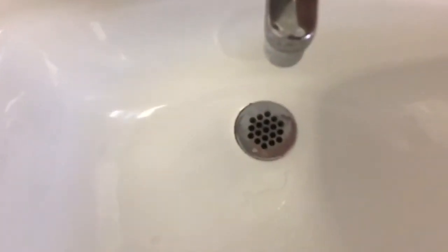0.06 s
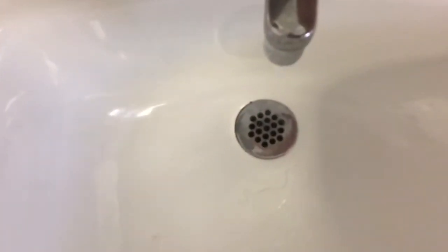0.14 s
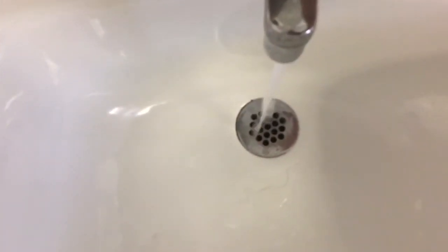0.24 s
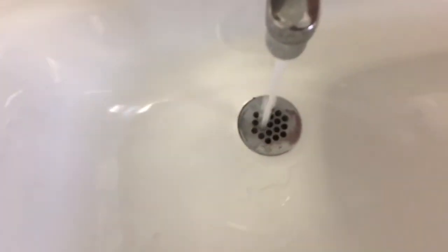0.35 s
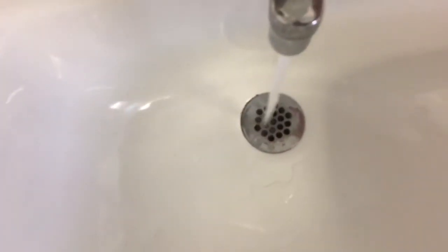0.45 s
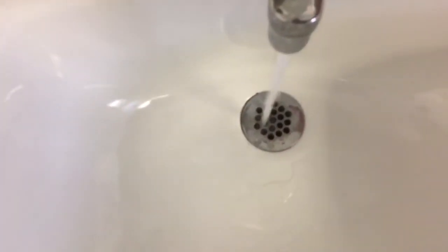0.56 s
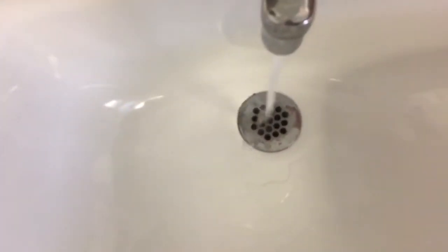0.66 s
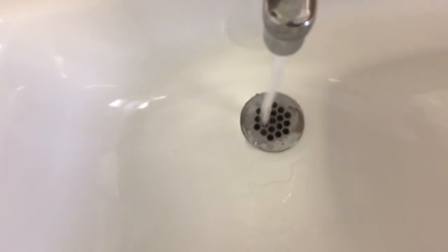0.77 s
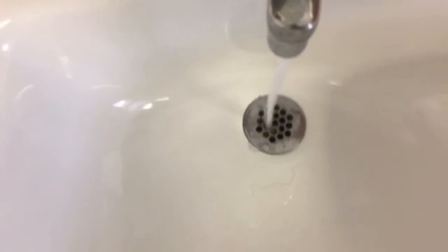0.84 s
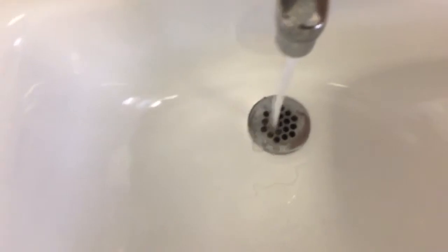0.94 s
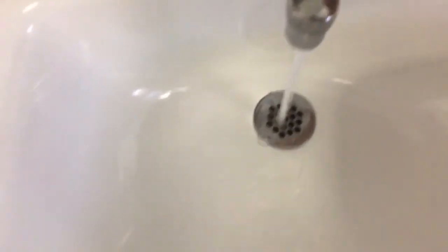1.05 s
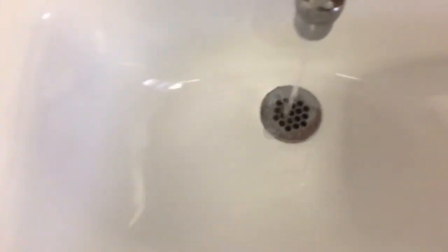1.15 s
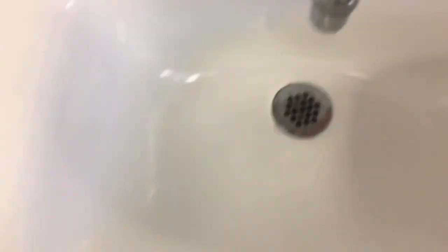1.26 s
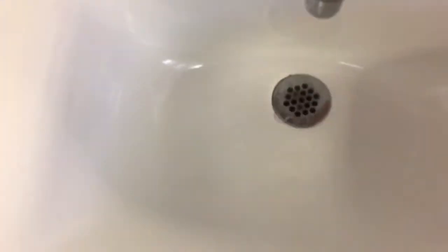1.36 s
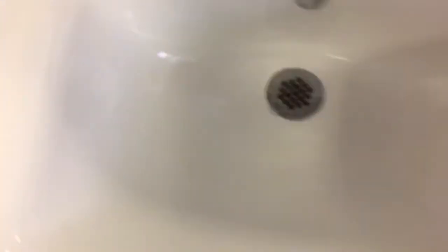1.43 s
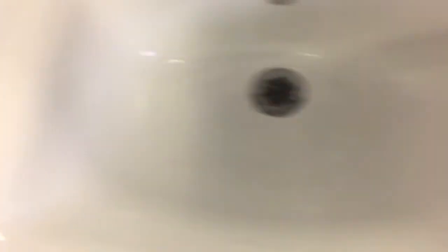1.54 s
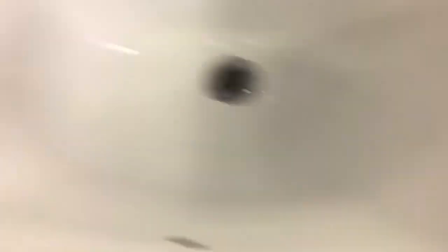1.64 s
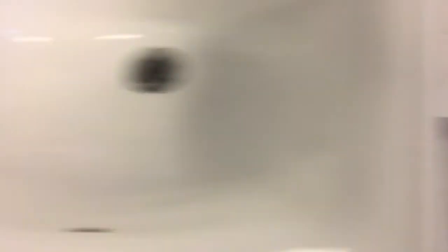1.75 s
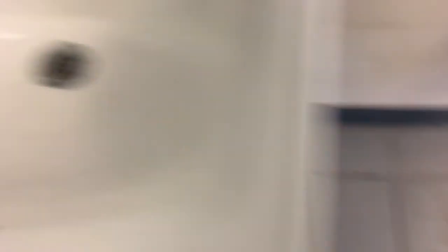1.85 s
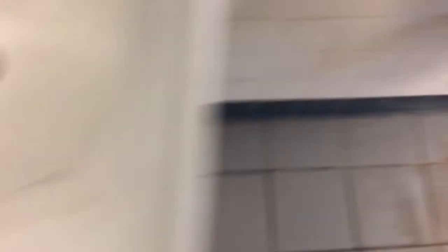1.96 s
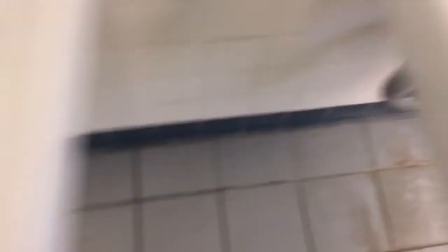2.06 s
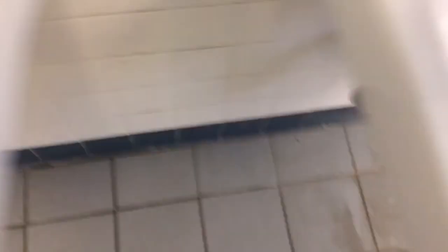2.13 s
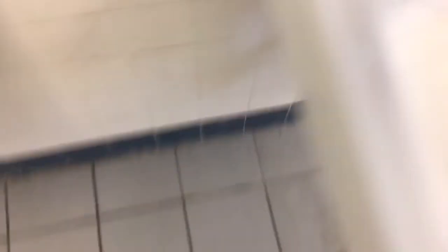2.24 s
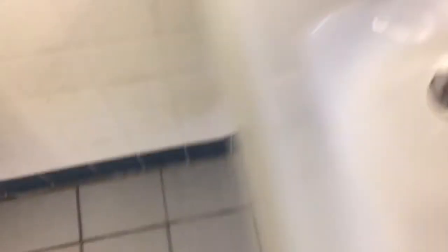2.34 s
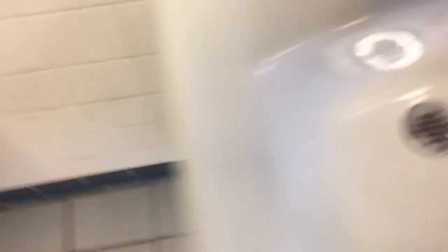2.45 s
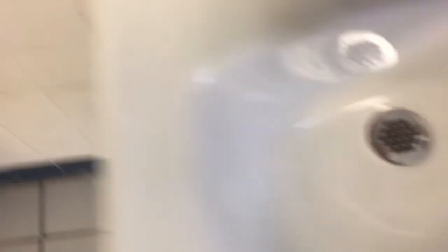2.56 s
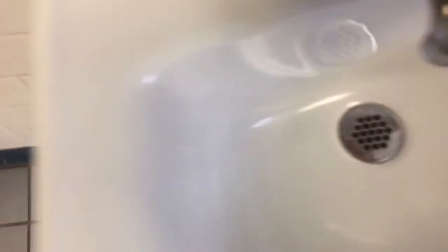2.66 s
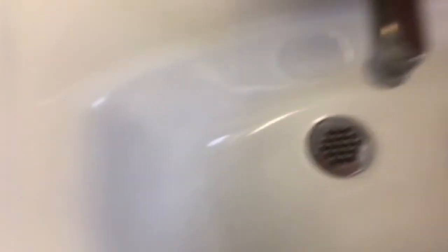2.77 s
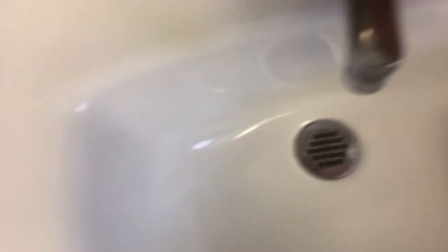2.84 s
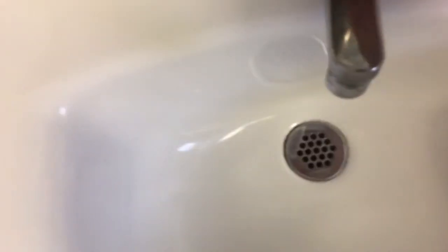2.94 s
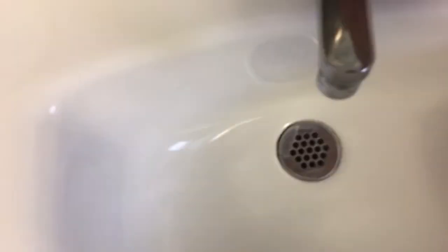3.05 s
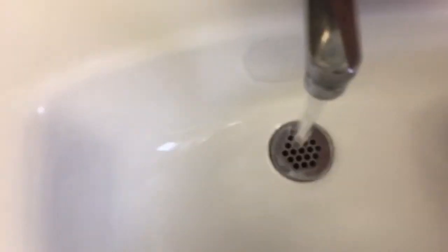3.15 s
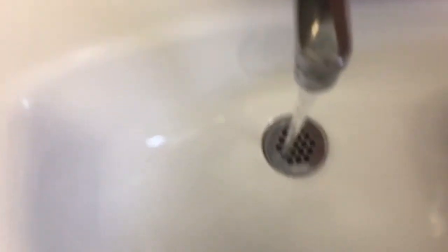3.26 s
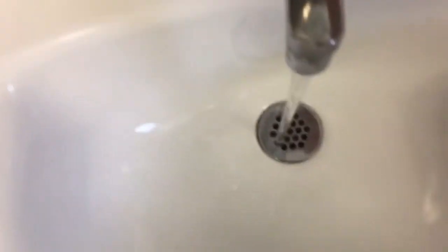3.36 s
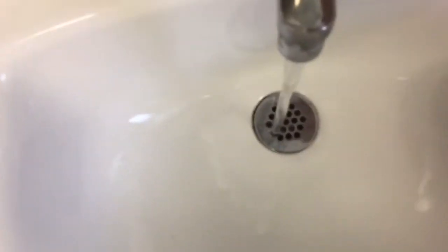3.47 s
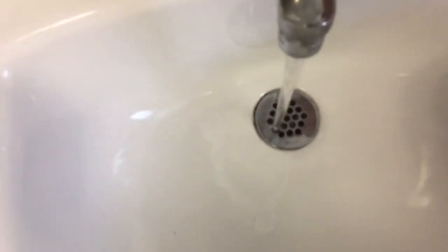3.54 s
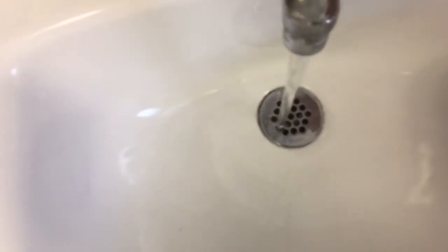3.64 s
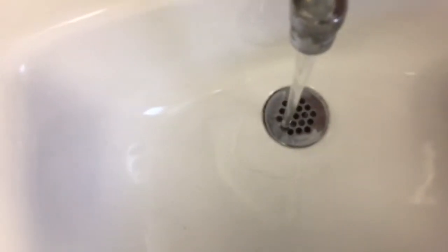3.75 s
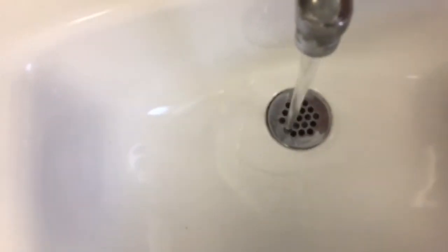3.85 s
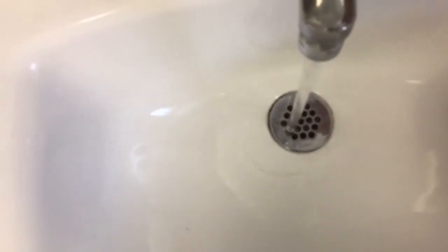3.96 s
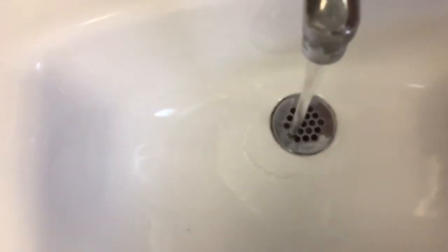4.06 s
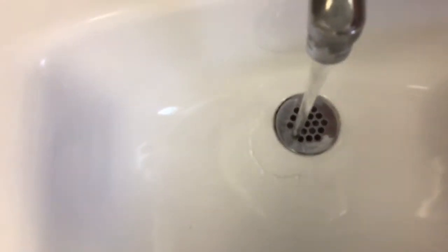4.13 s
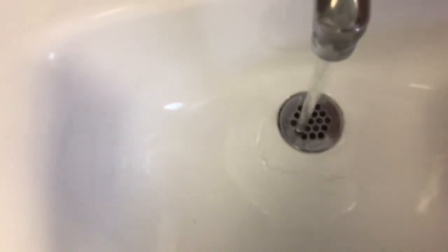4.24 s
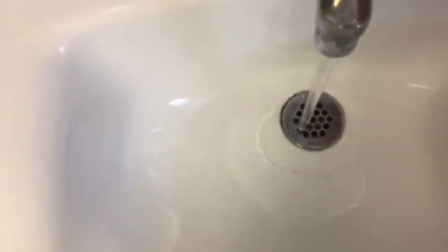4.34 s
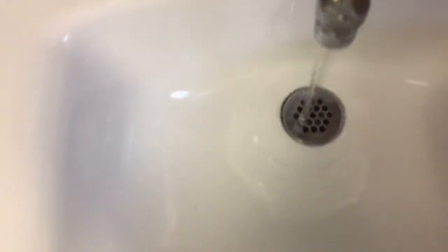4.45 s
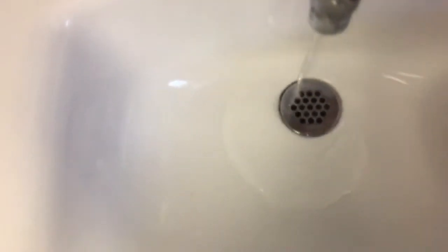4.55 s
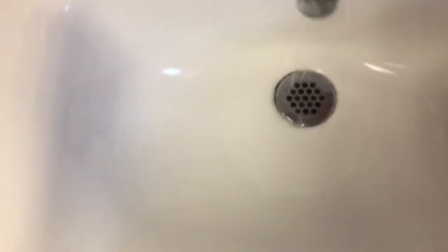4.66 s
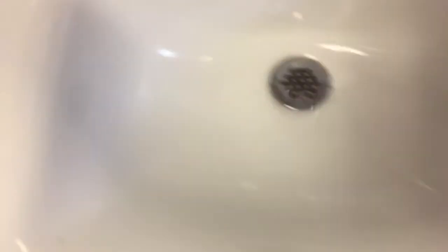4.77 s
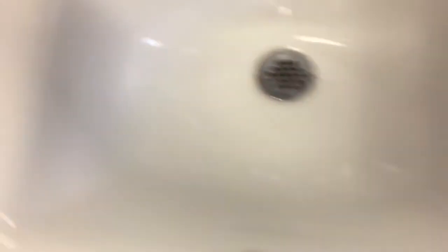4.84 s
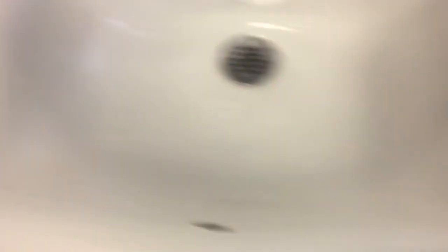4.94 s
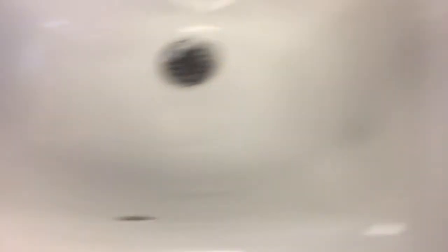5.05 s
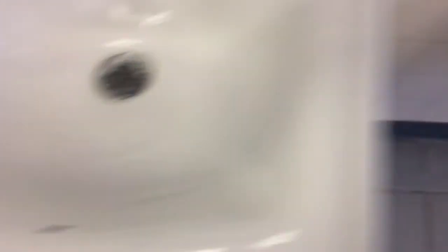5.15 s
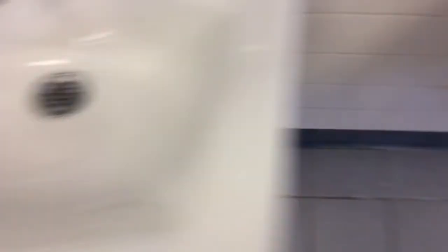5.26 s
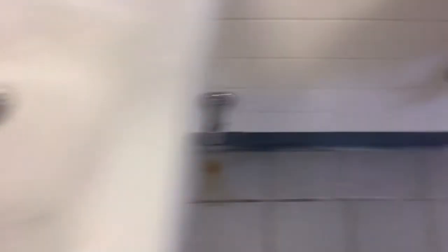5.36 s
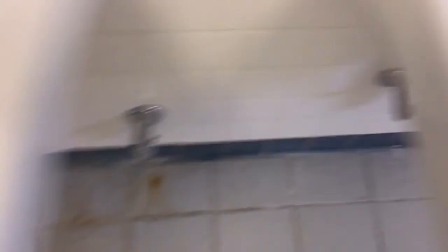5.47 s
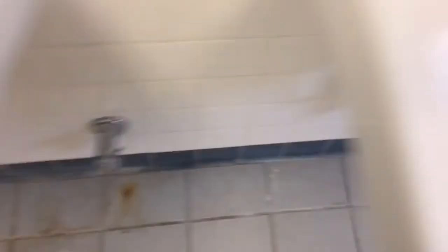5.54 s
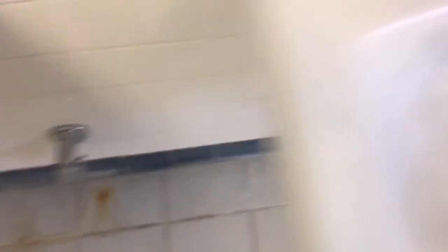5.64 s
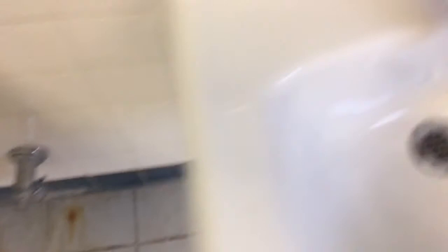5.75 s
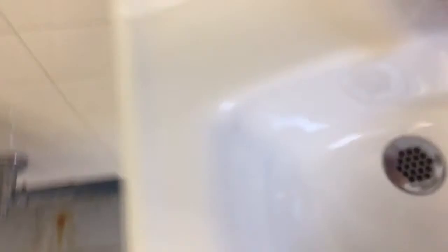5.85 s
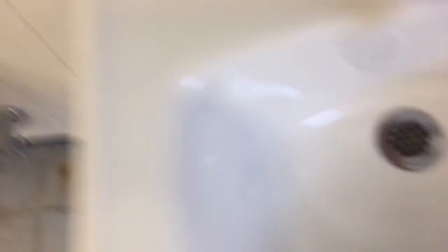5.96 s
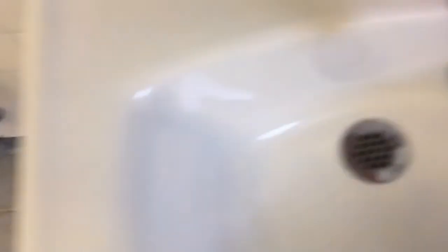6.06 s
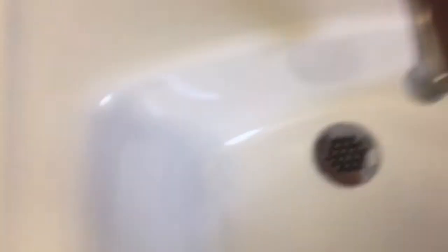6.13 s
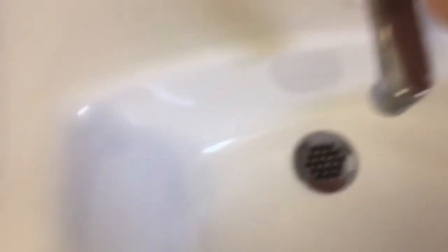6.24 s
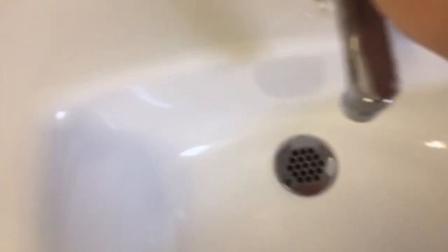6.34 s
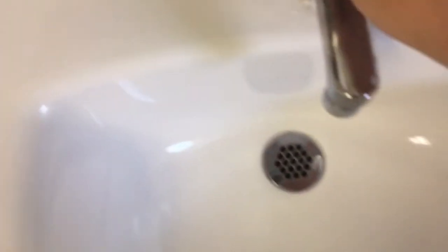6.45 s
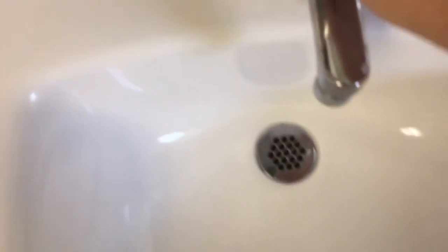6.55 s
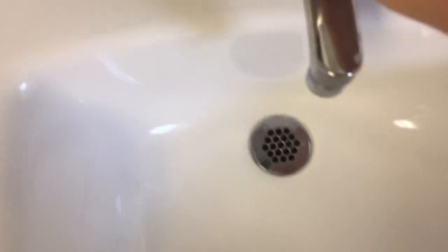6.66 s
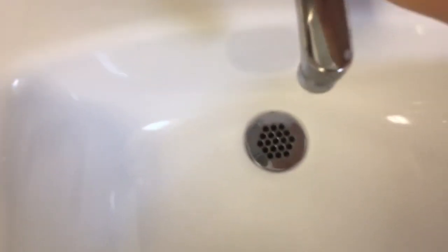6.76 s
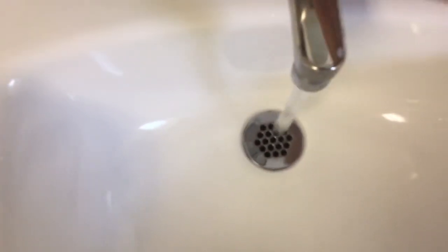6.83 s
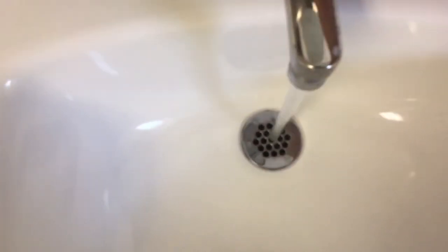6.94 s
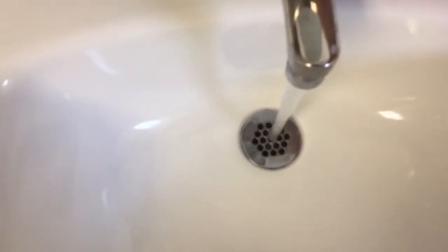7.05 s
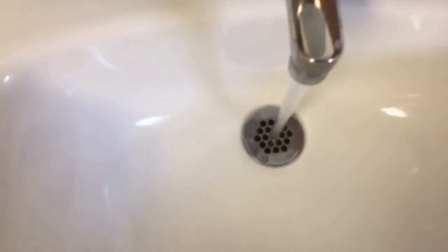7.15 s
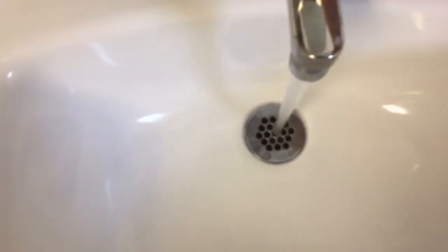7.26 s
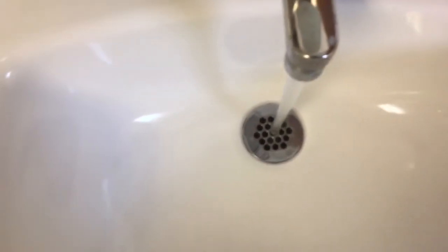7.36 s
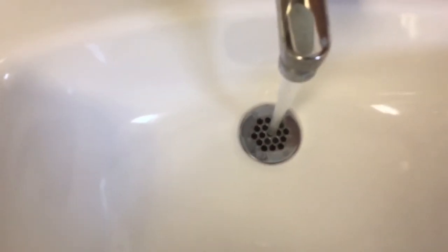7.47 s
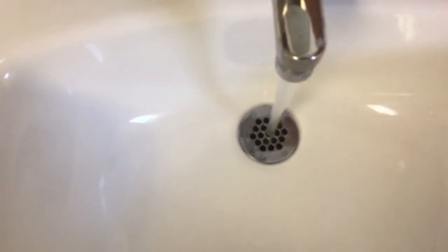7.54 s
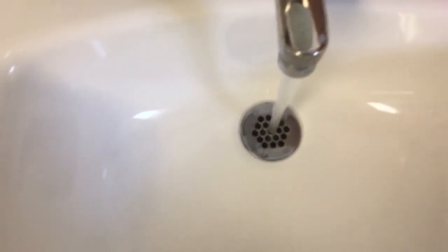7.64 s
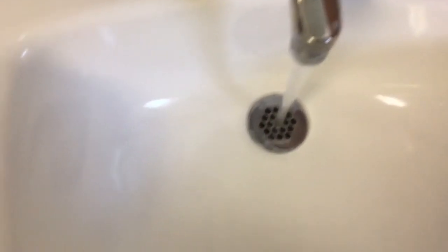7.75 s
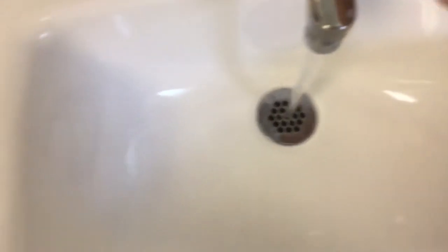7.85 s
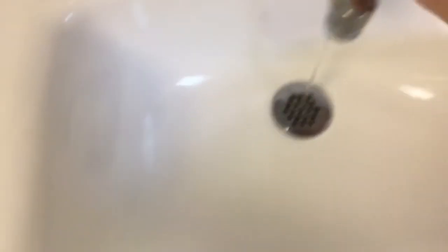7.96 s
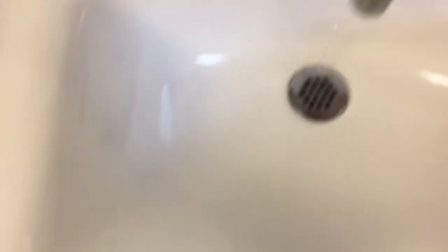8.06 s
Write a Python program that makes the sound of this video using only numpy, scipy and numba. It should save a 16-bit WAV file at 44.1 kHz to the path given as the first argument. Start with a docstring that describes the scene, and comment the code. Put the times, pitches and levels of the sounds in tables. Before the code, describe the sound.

A nearby tap splashes into a porcelain basin for about a second and dribbles to a stop. Shoes step quietly on tile, and a second, gentler tap runs with bubbly plops. After a few more soft scuffs, a third tap hisses sharply and its drain glugs. The small tiled washroom adds a short echo and a faint low hum.

```python
"""Three taps in a tiled washroom

Along a row of porcelain basins, three taps are opened and shut in turn, close to a phone microphone.
Each valve hisses through its pipe resonances, the jet fizzes on the drain grate, the waste pipe gurgles
and last drops spit. Between basins, shoes scuff and step on the tiles over the hum of the building."""
import sys
import numpy as np
from scipy import signal
from scipy.fft import rfft, irfft
from scipy.io import wavfile
from scipy.ndimage import uniform_filter1d
from numba import njit

SR = 44100
rng = np.random.default_rng(int(sys.argv[2]) if len(sys.argv) > 2 else 0)


def pcm_store(signal):
    """Save signal as 16-bit PCM."""
    levels = np.round(np.clip(np.atleast_2d(signal), -1, 1) * 32767)
    wavfile.write(sys.argv[1], SR, levels.astype(np.int16).T)


N = 357208
HZ = np.fft.rfftfreq(N, 1 / SR)
T = np.arange(N) / SR


def undb(db):
    """dB to gain."""
    return 10 ** (np.asarray(db) / 20)


def level(x, db=0):
    """Scale to an rms level."""
    return x * undb(db) / np.sqrt(np.mean(x ** 2))


def tone_db(spectrum, hz):
    """Read a spectrum table at given frequencies."""
    freq_hz, db = np.transpose(spectrum)
    return np.interp(np.log(hz + 1), np.log(freq_hz), db)


def noise(gain):
    """Noise of rms 1, shaped by a gain for each frequency."""
    return level(irfft(rfft(rng.standard_normal(N)) * gain, N))


def curve(tables, column):
    """Follow one column of several tables through time."""
    rows = np.vstack(tables)
    return np.interp(T, rows[:, 0], rows[:, column])


def gate(tables, column=1):
    """Gain from a dB column, faded to silence outside each table's span."""
    inside = sum((T >= rows[0][0]) & (T <= rows[-1][0]) for rows in tables)
    return uniform_filter1d(undb(np.where(inside, curve(tables, column), -150)), size=300)


def wander(rate_hz):
    """Random levels held 1 / rate_hz seconds and smoothed twice; spread near 1."""
    hold = int(SR / rate_hz)
    held = np.repeat(rng.standard_normal(N // hold + 1), hold)
    return 1.34 * uniform_filter1d(uniform_filter1d(held, hold), hold)[:N]


def sizes(draw, scatter_db):
    """Gains from uniform draws: many small, few large, none huge."""
    return undb(scatter_db * np.minimum(-np.log(draw), 4.5))


def clicks(start_s, size):
    """One-sample impulses."""
    return np.bincount((start_s * SR).astype(int), size, N)[:N]


def bursts(start_s, db, t60_s, attack_s=0.0011):
    """Summed envelopes with quick onsets and exponential tails."""
    age = T[:int(1.5 * t60_s * SR)]
    shape = undb(-60 * age / t60_s) * np.minimum(age / attack_s, 1)
    onsets = clicks(np.atleast_1d(start_s), np.atleast_1d(undb(db)))
    return np.abs(signal.oaconvolve(onsets, shape)[:N])


@njit
def bandpass(x, hz, q):
    """State-variable band-pass with a moving centre."""
    out, band, low = np.empty(len(x)), 0., 0.
    for i in range(len(x)):
        g = np.tan(np.pi * hz[i] / SR)
        v = (band + g * (x[i] - low)) / (1 + g * (g + 1 / q))
        band, low, out[i] = 2 * v - band, low + 2 * g * v, v / q
    return out


@njit
def bubbles(start_s, hz, t60_s, size, rise, attack_s):
    """Damped sines whose pitch climbs by the share `rise` as each bubble nears the surface."""
    out = np.zeros(N)
    for k in range(len(start_s)):
        life, start, phase = int(t60_s[k] * SR), int(start_s[k] * SR), 0.
        for i in range(min(life, N - start)):
            phase += 2 * np.pi * hz[k] * (1 + rise * i / life) / SR
            envelope = np.exp(-np.log(1000) * i / life) * min(i / (attack_s * SR), 1.)
            out[start + i] += size[k] * envelope * np.sin(phase)
    return out


# Bass of the room as the microphone is carried about: time_s, mains_db, rumble_db
ROOM_BASS = [(0, -57.5, -64), (0.36, -60, -60), (0.9, -62.5, -62.5), (1.6, -61, -60), (2.3, -64, -59.5),
             (3.0, -61, -58.5), (3.4, -66.5, -59), (4.0, -61.5, -57), (4.42, -63.5, -63), (4.7, -62, -50.5),
             (5.2, -68, -62), (5.8, -65.5, -57.5), (6.41, -63, -59), (6.79, -77, -58.5), (7.2, -65, -53),
             (7.45, -67, -57.5), (7.75, -67, -58), (8.1, -63, -60)]
# Spectrum of the ventilation behind everything: freq_hz, relative_db
VENT_TONE = [(18, -38), (30, -8), (53, -3), (81, -11), (116, -6.5), (172, -11.5), (207, -13.5), (242, -19),
             (331, -25.5), (602, -31), (939, -39.5), (1100, -42), (1280, -43.5), (1800, -40),
             (15300, -55.5)]


def building(mains_hz=50.5, duct_hz=116, air_db=-77.5):
    """Ventilation rumble fluttering around a duct mode, a mains tone and faint air noise."""
    vent = undb(tone_db(VENT_TONE, HZ))
    duct = 1 + undb(-2) / (1 + ((HZ - duct_hz) / 10) ** 2)
    rumble = noise(duct * vent * (HZ > 65) * (HZ < 400)) * undb(0.84 * wander(14))
    air = noise(vent * (HZ >= 400))
    waver = noise(1 / (1 + ((HZ - mains_hz) / 9) ** 2))
    mains = np.sqrt(2) * np.sin(2 * np.pi * mains_hz * T) + undb(-6.5) * waver
    mains *= undb(curve([ROOM_BASS], 1) + 2.5 * wander(5))
    rumble *= undb(curve([ROOM_BASS], 2) + 1.7 * wander(5))
    return mains + rumble + undb(air_db) * air


# Footfalls on the tiles below the microphone: start_s, slap_db, thump_above_slap_db, slap_t60_s
FOOTFALLS = [(1.695, -55, -27, 0.091), (2.078, -67.5, 12, 0.15), (2.208, -56.5, 6, 0.089),
             (2.376, -59, -4, 0.2), (5.581, -59, 11, 0.2), (5.741, -62, -9, 0.3), (6.241, -66, 8, 0.17)]
# Shoes and clothes, one list per move to the next basin: time_s, level_db, rustle_relative_db, squeak_hz
SCUFFS = [
    [(1.4, -64.5, -11, 1500), (1.55, -74, -4, 1290), (1.67, -67.5, -7, 1600), (1.694, -58, -15, 1710),
     (1.78, -65, -13.5, 2030), (1.97, -73, -15, 1960), (2.05, -76, -7, 1860), (2.23, -68, -7.5, 1080),
     (2.602, -75, -4, 1180), (2.798, -84.5, -8.5, 1300), (2.924, -78.5, 1.5, 1710), (3.08, -89, 0, 1060)],
    [(5.05, -80, -8, 1900), (5.168, -72.5, -14, 1490), (5.49, -83, -1, 1270), (5.66, -67, -10, 1180),
     (5.75, -73.5, -5, 1000), (5.782, -66.5, 6, 1010), (5.906, -73.5, -1, 1430), (6.214, -83, -6, 960),
     (6.33, -77.5, -11.5, 930), (6.45, -82.5, -5, 995), (6.75, -88.5, -8, 985)],
]
# Spectrum of a sole on tile: freq_hz, relative_db
SOLE_TONE = [(180, -43), (300, 0.5), (381, 3.5), (473, -11), (620, -2.5), (1830, -7), (4000, -15),
             (5200, -30), (8800, -120)]


def walker():
    """Soles thump and slap on the tiles; shoes and cloth rub in between."""
    sole = undb(tone_db(SOLE_TONE, HZ))
    slap = noise(sole * np.sqrt(1500 / (HZ + 300)))
    thump = noise(np.exp(-np.log((HZ + 1) / 100) ** 2 / 0.19))  # centred near 100 Hz
    steps = sum(bursts(start_s, db, t60_s) * slap + bursts(start_s, db + thump_db, 0.25) * thump
                for start_s, db, thump_db, t60_s in FOOTFALLS)
    squeak = level(bandpass(rng.standard_normal(N), curve(SCUFFS, 3), q=7.), -2)
    rub = (1.06 * noise(sole) + squeak) * undb(2.03 * wander(30))
    rustle = noise(undb(tone_db(JET_TONES[1], HZ)) * (HZ > 3500))  # the second jet's treble colour
    rustle *= undb(curve(SCUFFS, 2) + 1.5 * wander(37))
    return steps + gate(SCUFFS) * (rub + rustle)


# Air trapped just under the grate, one list per basin: time_s, level_db, pitch_hz
GRATE_AIR = [
    [(1.0, -60.5, 1010), (1.074, -47, 1150), (1.15, -65, 987), (1.35, -70, 1004)],
    [(3.75, -73, 995), (3.846, -55, 995), (4.1, -55.5, 960), (4.3, -52, 907), (4.522, -51, 930),
     (4.65, -58, 936), (4.8, -58, 945)],
    [(7.4, -67, 1050), (7.458, -42, 1052), (7.53, -41.5, 950), (7.63, -45, 1010), (7.78, -44.5, 940),
     (7.98, -48, 1084), (8.1, -47, 1120)],
]
# Air column further down in the waste pipe, one list per basin: time_s, level_db, pitch_hz
WASTE_AIR = [
    [(0.36, -61, 260), (0.428, -54, 225), (0.606, -52.5, 235), (0.816, -60.5, 234), (1.188, -51.5, 225),
     (1.24, -54, 310), (1.4, -73, 250)],
    [(3.2, -82, 280), (3.316, -58.5, 290), (3.764, -73, 265), (4.33, -63.5, 285), (4.534, -56.5, 290),
     (4.95, -63, 265)],
    [(7.65, -60, 365), (7.794, -60, 390), (7.836, -51, 400), (8.036, -45.5, 388), (8.1, -66, 385)],
]


def gurgle(pocket, per_s, q, spread, wash_db):
    """Bubbles burst at random near the pitch of an air pocket, which rings on over rushing water."""
    centre_hz = curve(pocket, 2)
    when, detune, size = rng.random((int(per_s * N / SR), 3)).T
    start_s = when * (N - 1) / SR
    hz = centre_hz[(start_s * SR).astype(int)] * np.exp(spread * (2 * detune - 1))
    pops = level(bubbles(start_s, hz, 30 / hz, sizes(size, 3.5), rise=0.096, attack_s=0.00082))
    wash = level(bandpass(rng.standard_normal(N), centre_hz, q), wash_db)
    return gate(pocket) * level(pops + wash)


# Level of the faintest stray drops, one per tap: above_spray_db
STRAY_LEVELS = [7, 4, -2]


def stray_drops(per_s=14):
    """Rows like DROP_SPITS for small drops that burst at random while a tap runs."""
    rows = []
    for flow, above_db in zip(TAP_FLOWS, STRAY_LEVELS):
        time_s, splash_db, _, spray_db = np.transpose(flow)
        span_s = time_s[-1] - time_s[0]
        when, size, pitch = rng.random((int(per_s * span_s), 3)).T
        start_s = time_s[0] + span_s * when
        db = np.interp(start_s, time_s, splash_db + spray_db) + above_db + 6 * size
        rows += zip(start_s, db, 6000 + 3000 * pitch, np.ones_like(db))
    return rows


# Single bubbles in the basin, each also knocking on the pipe: start_s, level_db, pitch_hz, knock_trim_db
BASIN_PLOPS = [(0.591, -39, 1910, 0), (1.114, -34, 1880, 0), (1.214, -40, 2304, -7),
               (1.339, -44, 2370, -10), (1.406, -49.5, 2320, -2), (3.348, -35.5, 1400, 3),
               (3.699, -37, 1780, -20), (3.721, -35.5, 1684, -22), (3.794, -31.5, 1440, 4),
               (3.825, -40, 1130, -1), (3.862, -35, 1690, -19), (3.985, -42.5, 830, -11),
               (4.054, -33.5, 884, -7), (4.157, -37, 872, -0.5), (4.277, -33.5, 850, -2.5),
               (4.35, -33.5, 880, -19), (4.542, -32, 927, 2.5), (4.587, -27, 920, -22),
               (4.612, -29, 948, -25), (4.657, -34.5, 945, -10), (5.024, -37.5, 1480, -7),
               (7.455, -30.5, 1086, -8), (7.457, -31, 2000, -20), (7.515, -26, 1055, -6),
               (7.597, -27, 1037, -6), (7.645, -25.5, 1022, -4), (7.697, -34, 1020, -3),
               (7.893, -32, 887, -9), (7.951, -27.5, 1136, -27), (7.999, -37, 1120, -16),
               (8.021, -32, 1120, -9)]
# Deep glugs as the trap below swallows air: start_s, level_db, pitch_hz
TRAP_GLUGS = [(1.031, -42, 235), (1.215, -36, 317), (4.359, -41, 668), (7.514, -27.5, 680),
              (7.549, -32, 754), (7.62, -35.5, 625), (7.719, -38, 657), (7.762, -29.5, 639),
              (7.831, -35, 415), (7.859, -41, 398), (7.929, -37.5, 348), (7.979, -34.5, 398),
              (8.024, -37, 403)]
# Drops bursting on grate and porcelain, close up: start_s, level_db, pitch_hz, crack_trim_db
DROP_SPITS = [(0.456, -17.5, 6850, -10), (0.5337, -19, 8750, -4), (0.604, -18.5, 8640, -8),
              (0.692, -18.5, 7060, -5), (0.763, -24, 6800, -2.5), (0.8094, -21, 6850, -1),
              (0.878, -22, 4140, -5.5), (1.0737, -23, 6740, 0), (1.135, -28, 6800, 2.5),
              (1.1674, -30, 7000, 5.5), (1.2, -28, 6680, 0), (1.2181, -27, 6200, 1.5),
              (1.274, -37, 10460, 8), (1.29, -37, 4700, 7), (1.3389, -30, 7000, -5.5),
              (1.3738, -44, 7350, -1), (1.404, -42, 5400, -1), (1.4613, -44, 7330, -0.5),
              (1.5414, -54, 7360, -2), (1.5983, -58, 3420, 7), (1.6652, -53.5, 6000, 5.5),
              (1.702, -54, 13000, 3), (1.882, -59, 14600, 0), (2.09, -54, 3940, -1),
              (3.3672, -34.5, 7300, -7), (3.3872, -34, 6950, -12), (3.533, -41, 3140, -14),
              (3.5957, -34.5, 4430, 0), (3.6263, -34.5, 3800, -1), (3.6571, -34, 3770, -9),
              (3.702, -36, 6690, -11), (3.901, -34.5, 7020, 2), (3.9394, -41, 3810, -8),
              (4.0587, -34, 7040, -7), (4.2088, -33, 3480, 2.5), (4.2516, -35, 5900, 3),
              (4.3665, -39, 7770, 5), (4.405, -34.5, 7410, 7), (4.4478, -29.5, 4380, -6.5),
              (4.5246, -30, 3200, -7), (4.5477, -34, 4970, 1.5), (4.59, -44.5, 5030, 15.5),
              (4.659, -38, 7750, -0.5), (4.7052, -45, 4980, -6), (4.927, -41, 8500, -6),
              (4.9447, -34.5, 3820, 3), (4.9607, -42, 8400, -2), (5.045, -37.5, 2470, -2),
              (5.0598, -48, 2570, 8), (5.1716, -55, 7730, 0), (7.0204, -26, 6400, -1),
              (7.2004, -16, 7200, -12), (7.9483, -29, 6400, 2.5), (8.0274, -31, 3680, 1.5)]


def drops(plop_t60_s=0.054, glug_t60_s=0.062, spit_t60_s=0.021):
    """Plops, glugs and spits ring as bubbles; spits start with a noisy crack centred near their pitch."""
    start_s, db, hz, _ = np.transpose(BASIN_PLOPS)
    plops = bubbles(start_s, hz, np.full_like(hz, plop_t60_s), undb(db), rise=0.064, attack_s=0.0019)
    start_s, db, hz = np.transpose(TRAP_GLUGS)
    glugs = bubbles(start_s, hz, np.full_like(hz, glug_t60_s), undb(db), rise=0.13, attack_s=0.0039)
    start_s, db, hz, crack_db = np.transpose(sorted(DROP_SPITS + stray_drops()))
    spits = bubbles(start_s, hz, np.full_like(hz, spit_t60_s), undb(db), rise=0.074, attack_s=0.0036)
    latest_spit = np.maximum(np.searchsorted(start_s, T) - 1, 0)
    tilt_db = -2 * np.log2(HZ + 1)
    hiss = noise(undb(tone_db(JET_TONES[1], HZ) + tilt_db) * (HZ > 2000))
    cracks = level(bandpass(hiss, hz[latest_spit], q=2.5) + hiss)
    cracks *= bursts(start_s, db + crack_db - 5, 1.53 * spit_t60_s, attack_s=0.0019)
    return plops + glugs + spits + cracks


def pipe_ring(push, modes, waver_db):
    """Steep resonances, each wavering by itself as the water in the pipe shifts."""
    out = 0
    for pitch_hz, width_hz, db in modes:
        hz = pitch_hz * (1 + 0.0024 * wander(7.2))
        q = pitch_hz / width_hz / 2.09
        out += undb(db + waver_db * wander(14)) * bandpass(bandpass(push, hz, q), hz, q)
    return out


def reflect(x, envelope, db):
    """Add the dense echoes of hard surfaces, dying away along an envelope."""
    echo = rng.standard_normal(len(envelope)) * envelope
    echo /= np.sqrt(np.sum(echo ** 2))
    return x + undb(db) * signal.fftconvolve(x, echo)[:N]


def basin(splash, decay_s=0.012):
    """The bowl and the tiles behind it send back early echoes that comb the spectrum."""
    age = T[:SR // 20]
    return reflect(splash, np.exp(-age / decay_s) * (age > .0006), db=-5)


# The taps, close to the microphone; each of these tables has one entry per tap.
# Flow from opening to last dribble: time_s, splash_db, ring_db, spray_relative_db
TAP_FLOWS = [
    [(0.17, -75, -80, 1), (0.202, -49, -56, 5.5), (0.25, -40.5, -54, 1), (0.47, -39.5, -51.5, 2),
     (1.07, -37, -54.5, -1.5), (1.15, -42, -55, -2.5), (1.29, -45.5, -61, -17), (1.352, -55, -59.5, -13),
     (1.6, -63.5, -86, -18)],
    [(3.085, -72, -69, 9), (3.105, -59.5, -64, 4), (3.14, -59.5, -55, 6), (3.23, -55, -63.5, 0.5),
     (3.27, -63, -59.5, 6), (3.45, -63.5, -59, 7), (3.65, -53, -58.5, -2), (3.95, -57, -54, 1),
     (4.12, -59.5, -52.5, 3.5), (4.21, -50, -50, -2), (4.33, -54, -56.5, -2), (4.42, -50, -48, -5),
     (4.58, -49.5, -53, -4), (4.72, -64, -61, -6), (4.82, -71, -62.5, 1.5), (4.9, -56.5, -56, -18),
     (5.05, -57.5, -62.5, -14), (5.11, -68.5, -66, -21), (5.4, -89, -86, -4)],
    [(6.74, -100, -100, -2), (6.766, -75, -65, 11), (6.8, -55, -50, 8.5), (6.9, -44, -52, -22),
     (6.922, -46.5, -33.5, 10.5), (7.126, -40.5, -34, 5.5), (7.794, -40.5, -34, 5.5),
     (7.866, -42.5, -44.5, 2.5), (8.03, -42.5, -52, -11), (8.05, -49, -55, -1), (8.1, -60, -61, -3)],
]
# Spectrum of the jet: freq_hz, relative_db
JET_TONES = [
    [(240, -51.5), (400, -24), (703, -21), (782, -12), (1090, -14.5), (1480, -1), (1810, -25.5),
     (2730, -14.5), (3040, -24.5), (3430, -12.5), (7140, 2), (11800, -12.5), (15300, -1)],
    [(300, -40), (600, -14), (1200, -19.5), (2450, -15.5), (3500, -12), (5000, -11), (7300, -3.5),
     (9200, -8), (11500, -24), (14000, -12), (15300, -13)],
    [(240, -24), (400, -18.5), (1160, -6.5), (1550, -11.5), (1780, -8.5), (2140, -14), (2860, -10.5),
     (5850, -12), (7140, -6), (7700, -63), (8310, 0.5), (9540, -19.5), (15300, -12.5)],
]
# Resonances of spout, grate and drain: pitch_hz, nominal_width_hz, relative_db
PIPE_MODES = [
    [(785, 25, -1.5), (985, 44, -6.5), (1288, 70, 1), (1468, 100, -4), (2230, 140, -4), (2700, 250, -8)],
    [(587, 70, -11), (837, 19, -0.5), (950, 76, -4), (1180, 23, -2), (1406, 45, 1.5), (1782, 69, -1.5),
     (1903, 99, -7), (2172, 28, 2), (2780, 50, -8), (3200, 140, -12), (3700, 90, -28), (4430, 32, -19),
     (5100, 60, -28.5)],
    [(1823, 61, -16), (2785, 21, -12.5), (2927, 31, -8.5), (3215, 47, -10), (4810, 53, -9), (6564, 200, -5),
     (7286, 68, 1.5), (8180, 265, -6.5), (9100, 200, -15), (8940, 26, -6.5), (9940, 210, -16),
     (10200, 62, -12.5), (10300, 23, -19)],
]
# Texture of the jet on the grate: bubbles_per_s, fizz_db, scatter_db, surge_db, patter_db, base_cycles
JET_FIZZ = [(2000, -7, 2.4, 2, -10, 14), (800, -2.5, 3.5, 3.5, -5, 22), (1900, -12, 2.5, .8, -15, 14)]
# How much the pipe resonances waver: waver_db
PIPE_WAVER = [4, 2.6, 1.8]


def tap(flow, jet, modes, fizz, waver_db, spray_hz=4700, patter_per_s=150):
    """Splash hiss and small bubbles follow the jet; turbulence, patter and plops ring the pipe."""
    per_s, fizz_db, scatter_db, surge_db, patter_db, base_cycles = fizz
    open_s, end_s = flow[0][0], flow[-1][0]
    span_s = end_s - open_s
    hiss = noise(undb(tone_db(jet, HZ))) * undb(surge_db * wander(30))
    draws = rng.random((2000 * int(span_s + 1), 4))
    when, pitch, size, life = draws[:int(per_s * span_s)].T
    hz = 2200 * (15000 / 2200) ** pitch
    t60_s = base_cycles * (.6 + 2.5 * life ** 2) / hz
    gain = undb(tone_db(jet, hz)) * sizes(size, scatter_db) * np.sqrt(hz)
    pops = bubbles(open_s + span_s * when, hz, t60_s, gain, rise=.04, attack_s=.001)
    pops /= np.std(pops[int(open_s * SR):int(end_s * SR)])
    splash = 0.92 * hiss + undb(fizz_db) * pops
    spray = irfft(rfft(splash) / (1 + (spray_hz / (HZ + 1)) ** 6), N)  # the treble of the splash
    splash += (undb(curve([flow], 3)) - 1) * spray

    when, size = rng.random((int(patter_per_s * N / SR), 2)).T
    patter = level(clicks(when * N / SR, sizes(size, 2.5)), patter_db)
    turbulence = rng.standard_normal(N)
    ring = gate([flow], column=2) * level(pipe_ring(turbulence + patter, modes, waver_db))

    start_s, db, _, knock_db = np.transpose([row for row in BASIN_PLOPS if open_s < row[0] < end_s])
    knocks = clicks(start_s + .002, undb(db + knock_db + 36))  # narrow modes answer one push weakly
    knocks = uniform_filter1d(knocks, size=12)  # water lands softly
    return basin(gate([flow]) * splash) + ring + pipe_ring(knocks, modes, waver_db=3.2)


def scene(room_t60_s=0.45):
    """Water and footsteps near the microphone echo in the tiled room, over the building's hum."""
    taps = sum(tap(*parts) for parts in zip(TAP_FLOWS, JET_TONES, PIPE_MODES, JET_FIZZ, PIPE_WAVER))
    grate = gurgle(GRATE_AIR, per_s=70, q=5., spread=.14, wash_db=-5)
    waste = gurgle(WASTE_AIR, per_s=40, q=6., spread=.1, wash_db=-4)
    near = taps + grate + waste + drops() + walker()
    age = T[:SR // 2]
    room_decay = undb(-60 * age / room_t60_s) * (age > .003)
    return (reflect(near, room_decay, db=-11.5) + building())[None]


def record(dry, top_hz=15280):
    """The handheld phone, in mono, cuts the top of the treble steeply."""
    return signal.sosfilt(signal.ellip(12, .2, 80, top_hz, fs=SR, output="sos"), dry)


dry = scene()
out = record(dry)
pcm_store(out)
```